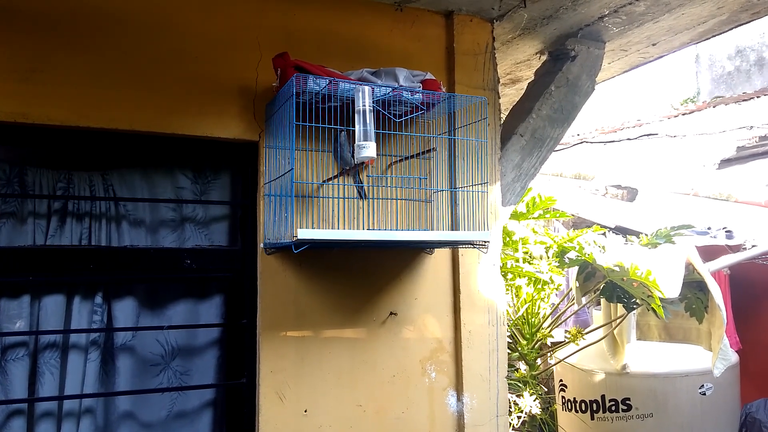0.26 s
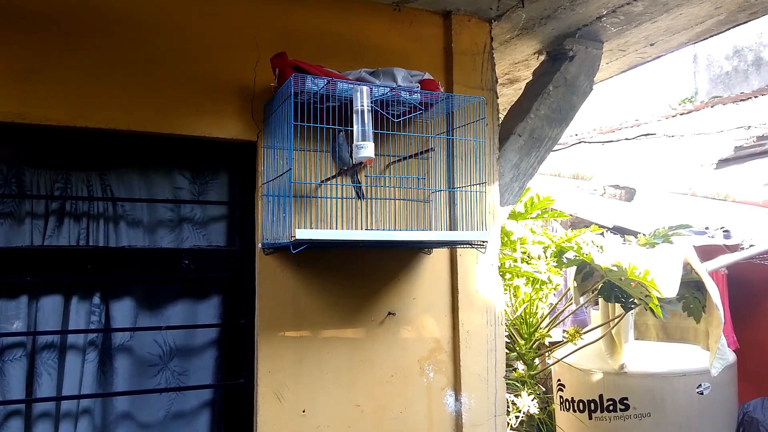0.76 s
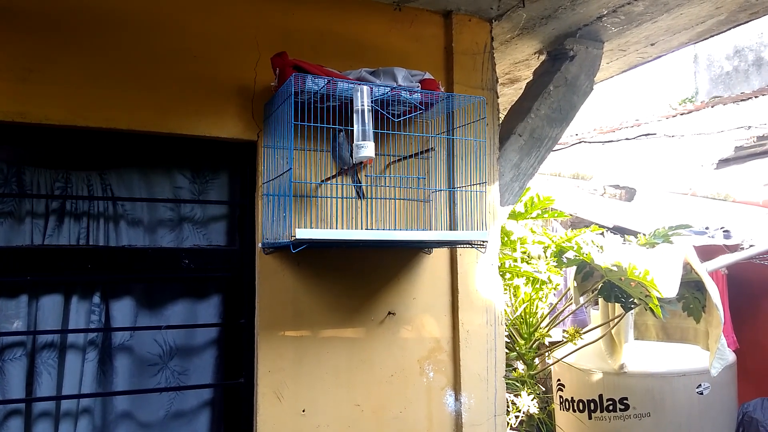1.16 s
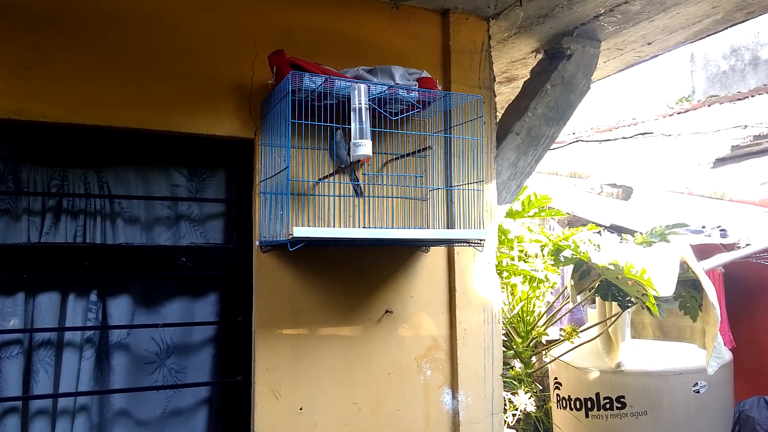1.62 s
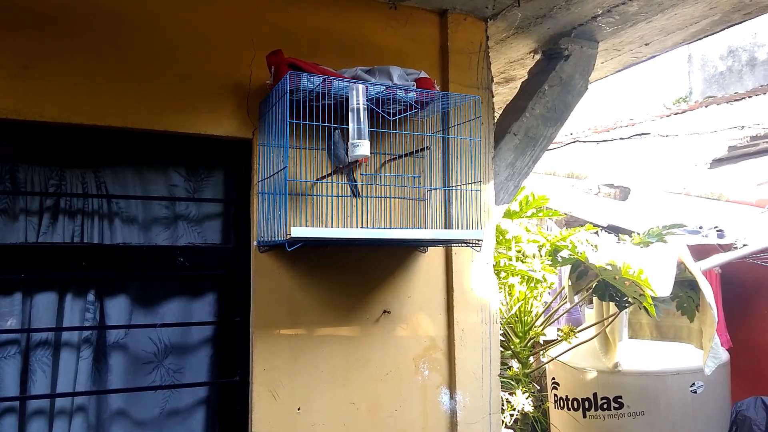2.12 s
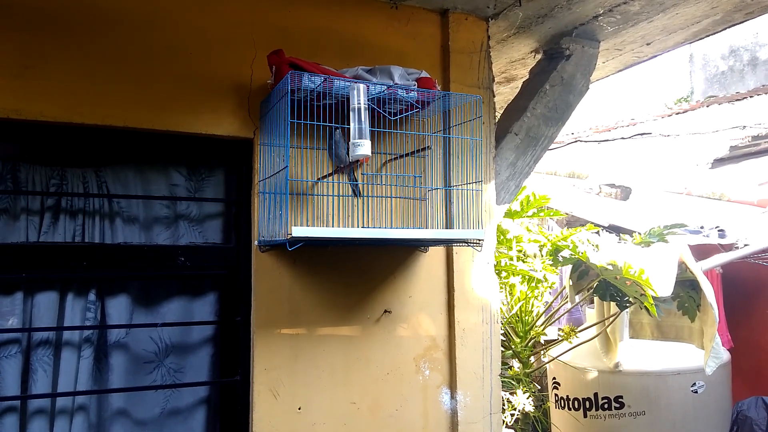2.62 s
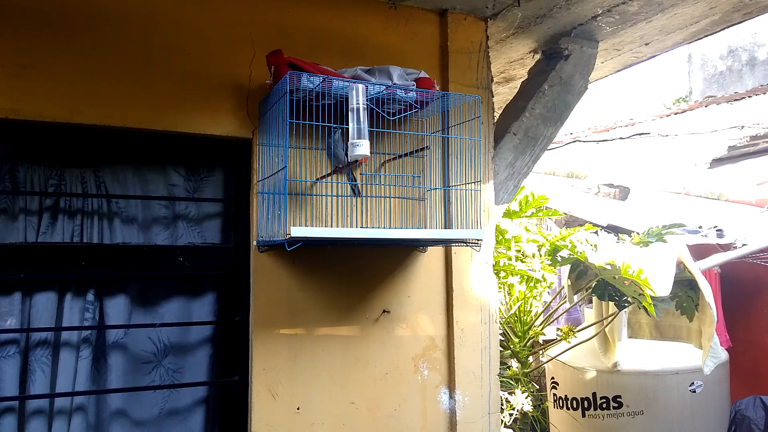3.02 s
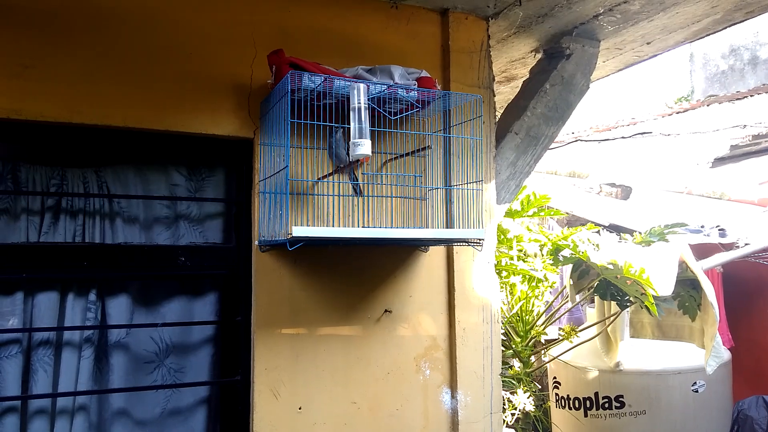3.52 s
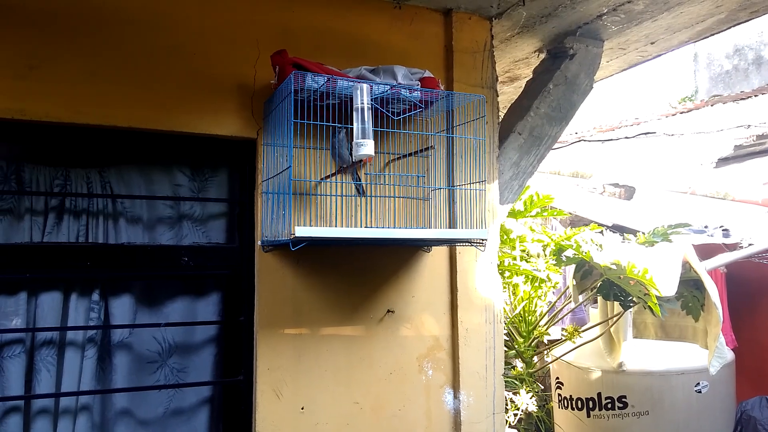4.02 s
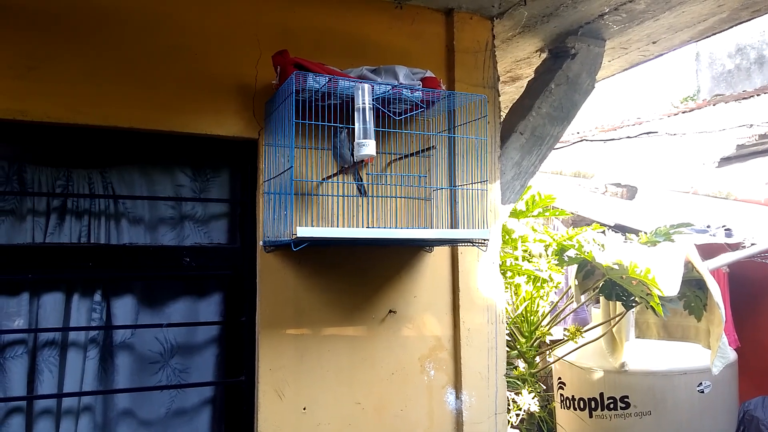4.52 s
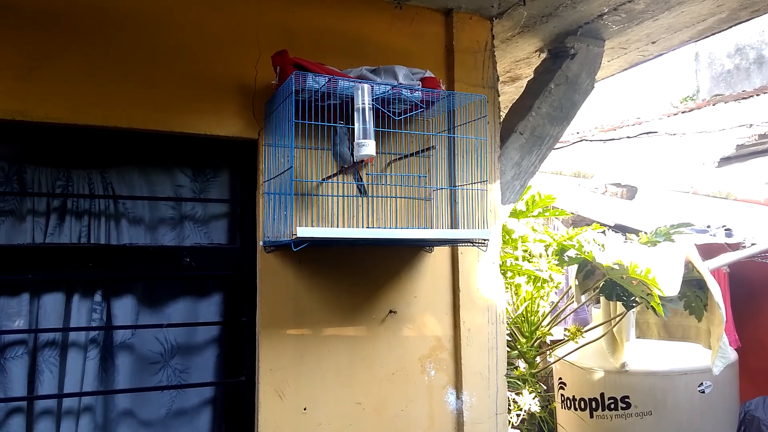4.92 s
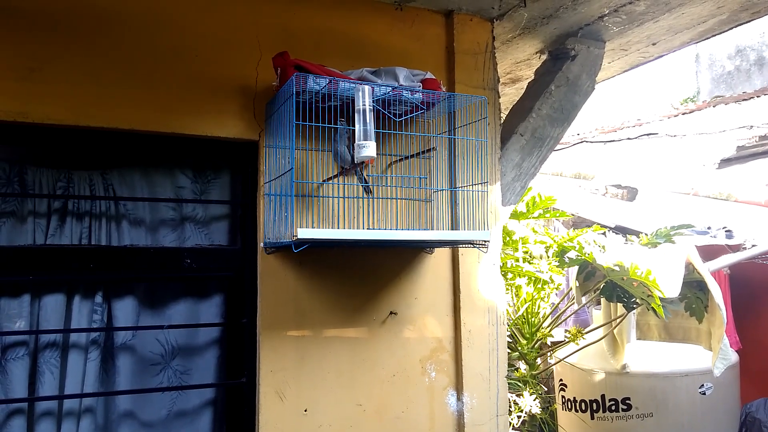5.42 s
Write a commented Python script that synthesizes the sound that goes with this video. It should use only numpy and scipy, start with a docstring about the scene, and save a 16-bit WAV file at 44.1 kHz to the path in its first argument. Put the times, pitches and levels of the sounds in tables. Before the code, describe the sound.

Outdoors under a house's concrete eaves, a phone catches a small bird's very fast song: glassy high notes, quick glides, trills and scratchy rasps, with tiny gaps and short reflections. It stops before three seconds. Muffled town noise and unsteady motor hum come up slightly; faint rustling on the right, a far chirp, then a single rasping call and finally a dull thud.

```python
"""A caged solitaire sings a fast run of whistles, glides, trills and rasps, later one harsh call, over town rumble.
Both sides of its syrinx sound as modulated sines with weak overtones and turbulent air hiss; beak snaps are noise.
Walls and a concrete roof answer with decaying noise tails. Traffic is coloured noise, a motor's hum a set of sines;
rustles and a far bird's overtones come before the harsh call, a dull knock after it. A phone's two microphones feed
a stereo widener and a gain control that turns down fast and recovers slowly."""
import sys
import numpy as np
from scipy import signal
from scipy.fft import rfft, irfft, next_fast_len
from scipy.io import wavfile
from scipy.ndimage import uniform_filter1d, map_coordinates

SR = 44100
rng = np.random.default_rng(int(sys.argv[2]) if len(sys.argv) > 2 else 0)


def gain_from_db(level_db):
    """Turn a decibel level (scalar or array-like) into a linear amplitude factor."""
    decades = np.asarray(level_db, float) / 20
    return 10 ** decades


def master_out(mix):
    """Clip the mix to full scale and print it as 16-bit PCM to the path in sys.argv[1]."""
    frames = np.transpose(np.atleast_2d(mix))
    ceiling = np.clip(frames, -1, 1)
    pcm = np.round(ceiling * 32767).astype(np.int16)
    wavfile.write(sys.argv[1], SR, pcm)


N = 249606

# All source levels are taken ahead of room, microphones, widener and gain control.
# Level notes, from brief pips to longer whistles: start_s, length_s, pitch_hz, level_db
WHISTLES = [(0.089, 0.089, 3003, -27), (0.119, 0.042, 3673, -23.5), (0.434, 0.075, 4600, -34.5),
            (0.256, 0.029, 3700, -24.5), (0.286, 0.037, 2260, -25), (0.364, 0.096, 2278, -30),
            (0.386, 0.097, 3646, -28.5), (0.397, 0.08, 5923, -33), (0.407, 0.06, 6910, -35),
            (0.597, 0.026, 2770, -28), (0.617, 0.038, 3006, -24.5), (0.626, 0.02, 3578, -29.5),
            (0.709, 0.046, 4560, -19), (0.739, 0.012, 3585, -19), (0.759, 0.018, 3070, -26),
            (0.777, 0.015, 4590, -18.5), (0.885, 0.028, 5573, -15), (0.91, 0.06, 3734, -20.5),
            (1.181, 0.0063, 3670, -20.5), (1.192, 0.067, 8840, -41), (1.588, 0.011, 5620, -13.5),
            (1.647, 0.023, 5540, -19.5), (1.747, 0.022, 2783, -25.5), (1.779, 0.084, 2862, -23),
            (1.797, 0.0066, 3290, -18), (1.808, 0.074, 4317, -21.5), (1.865, 0.051, 5668, -18.5),
            (2.236, 0.0055, 6750, -16.5), (2.712, 0.05, 2660, -25.5), (2.707, 0.031, 3796, -26.5),
            (2.752, 0.015, 3660, -18.5)]
# Gliding notes: start_s, length_s, start_hz, end_hz, level_db
GLIDES = [(0.0, 0.085, 4775, 4740, -26.5), (0.251, 0.038, 4950, 4630, -15.5),
          (0.298, 0.022, 2295, 1610, -35), (0.345, 0.031, 2900, 3450, -26.5),
          (0.78, 0.043, 2516, 1790, -30.5), (1.377, 0.085, 3030, 1550, -28.5),
          (1.38, 0.086, 5960, 2607, -22), (1.418, 0.034, 4050, 3566, -14.5),
          (2.237, 0.02, 5650, 5230, -20.5), (2.453, 0.02, 2570, 3480, -28),
          (2.477, 0.0322, 3690, 4140, -26.5), (2.48, 0.028, 2880, 2550, -25),
          (2.782, 0.081, 5200, 5390, -38)]
# Quick upward flicks leading into a note: start_s, start_hz, level_db
FLICKS = [(0.588, 1830, -29), (0.614, 3100, -31), (0.868, 3435, -20), (0.883, 3630, -19.5),
          (0.909, 2894, -21.5), (1.206, 2960, -23.5), (1.606, 3323, -24), (1.771, 3220, -29),
          (1.799, 3110, -34), (1.931, 3340, -20.5), (2.467, 4130, -30.5), (2.749, 2756, -11),
          (2.797, 5540, -32)]
FLICK_S, FLICK_RISE = 0.0112, 1.35  # length; end pitch over start pitch
# Short falling chips: start_s, start_hz, level_db
CHIPS = [(0.039, 5880, -32), (0.076, 4030, -16.5), (0.222, 6840, -27.5), (0.35, 3296, -26.5),
         (0.85, 7230, -23.5), (0.872, 5800, -17), (0.952, 3210, -21.5), (1.168, 2950, -28.5),
         (2.187, 4175, -18), (2.201, 2910, -17)]
CHIP_S, CHIP_FALL = 0.014, 0.87  # length; end pitch over start pitch
# Trains of swept chips: start_s, length_s, centre_hz, sweep_hz, chips_per_s, level_db
TRILLS = [(0, 0.062, 6530, 1099, 113, -16.5), (2.5, 0.18, 5950, -1800, 80, -22.5),
          (2.5, 0.161, 3780, -300, 68, -26), (2.5, 0.085, 3200, -400, 62, -24),
          (1.3, 0.098, 2850, 256, 68, -17.5)]
# Rasps with randomly shaken pitch: start_s, length_s, start_hz, end_hz, shake_hz, level_db
RASPS = [(1.2, .07, 3300, 3900, 550, -27), (1.245, .115, 5400, 4600, 300, -25),
         (1.25, .14, 4500, 3750, 300, -22.5), (1.275, .1, 1900, 1150, 120, -44),
         (1.605, .09, 4000, 3800, 500, -29), (1.94, .07, 3600, 3300, 480, -23),
         (2.04, .12, 3200, 3000, 420, -25), (2.17, .06, 3700, 3300, 500, -29),
         (4.575, .14, 1600, 2200, 260, -40), (4.575, .125, 2700, 3600, 190, -37),
         (4.595, .16, 3600, 4400, 190, -31), (4.59, .13, 5400, 6800, 250, -35),
         (4.69, .15, 5400, 4750, 220, -23.5), (4.68, .17, 4480, 3980, 150, -23),
         (2.755, .06, 3500, 3000, 300, -29), (.245, .06, 6600, 5600, 600, -36),
         (.09, .1, 4300, 3900, 500, -33)]
# Octave strength against note pitch: pitch_hz, octave_db
OCTAVE = [(2000, -5.5), (2350, -5), (2800, -21), (4600, -15.5), (6800, -7)]
# Higher overtones of the song: multiple, level_db
UPPER_OVERTONES = [(3, -38), (4, -50.5)]
# Relative spectrum of air hiss in the beak: frequency_hz, density_db (per Hz)
BREATH = [(1500, -39), (3000, -7), (5000, 2.5), (6800, -10.5), (8500, -6), (10000, -9), (11500, -6.5),
          (14000, -13.5), (15600, -21)]
# Decay time of wall and roof reflections: frequency_hz, t60_s
EAVES_DECAY = [(2000, 0.43), (4000, 0.48), (8000, 0.41), (15000, 0.28)]
# Relative spectrum of town noise: frequency_hz, density_db (per Hz)
TOWN_SPECTRUM = [(30, -53), (60, 4), (120, 7.5), (250, 1.5), (630, 0), (1300, -2.5), (1750, -12),
                 (2050, -9.5), (2400, -13), (2850, -4), (3300, -21), (4500, -29.5), (8000, -31.5),
                 (15700, -34.5)]
# Level of town noise over time: time_s, level_db
TOWN_LEVEL = [(0, -42.5), (2, -40), (2.9, -45), (3.3, -40.5), (4.5, -41), (5, -42.5), (5.66, -39)]
# Correlation of town noise between the two microphones: frequency_hz, correlation
TOWN_CORRELATION = [(60, .45), (500, .35), (2000, .2), (8000, .1)]
HUM_HZ = 59.6  # shaft rate of the motor
# Upper lines of the motor's hum: shaft_order, amplitude_db
HUM_LINES = [(3, -58), (4.015, -47.5), (6.99, -56), (8.02, -55), (9.7, -52), (10.66, -53.5), (13, -59.5),
             (11.77, -58.5), (15.9, -62), (18.95, -61.5), (21.36, -56.5)]
# Swelling and fading of the lowest hum line: time_s, level_db
DEEP_HUM_LEVEL = [(0.0, -64), (0.31, -69), (0.61, -39.5), (1.02, -56), (1.25, -42), (1.76, -46.5),
                  (1.84, -59), (3.41, -48.5), (3.97, -72), (4.65, -44.5), (4.82, -69), (5.66, -50)]
# Beak snaps between notes: start_s, level_db (at the start)
SNAPS = [(0.225, -19), (0.25, -26.5), (0.885, -25), (1.885, -19), (2.237, -24), (2.751, -30)]
# Relative spectrum of a snap: frequency_hz, density_db (per Hz)
SNAP_SPECTRUM = [(2500, -31.5), (5500, -6), (15000, -8.5)]
# Beating pairs of steady tones, levels before DUET_DB: start_s, length_s, pitch_hz, second_hz, level_db, second_db
DUETS = [(0.655, 0.1, 2989, 2920, -6, -11), (2.04, 0.125, 2988, 2803, -9, -8),
         (2.05, 0.11, 3195, 2908, -18, -15)]
DUET_DB, DUET_WET_DB = 4, -7  # gain of all duets; their further gain into the reflections
# Small rustles, levels before the left-right balance: start_s, level_db (at the start), t60_s
RUSTLES = [(3.546, -46.5, 0.61), (3.95, -62, 0.39), (4.2, -60, 0.29)]
# Relative spectrum of a rustle: frequency_hz, density_db (per Hz)
RUSTLE_SPECTRUM = [(3000, -35), (6000, -20), (9500, -11), (15700, -20)]
# Distant call, fundamental pitch and level before FAR_TONES: time_s, pitch_hz, level_db
FAR_CALL = [(4.202, 950, -78), (4.239, 988, -43.5), (4.279, 1072, -43.5), (4.341, 1085, -50.5),
            (4.42, 1080, -82), (4.479, 1130, -83)]
# Overtones heard in the distant call: multiple, level_db
FAR_TONES = [(2, -3), (3, 7.5)]
# Dull distant knocks: start_s, peak_db, pitch_hz
KNOCKS = [(5.282, -30, 244)]
# Right microphone relative to left: frequency_hz, difference_db
RIGHT_OVER_LEFT = [(200, 5), (1000, 2), (2500, -2), (5000, 2), (8000, 5), (13000, 7)]
# Strength of the widener's crossed copy: frequency_hz, level_db
CROSS_FEED = [(200, -9), (1200, -3), (2400, -1.5), (4900, -3.5), (7400, -2.5), (8500, -4), (10500, -11),
              (15000, -15)]
TOP_HZ, WIDEN_SAMPLES = 15700, 18  # upper limit of the microphone band; delay of the widener


def along(points, hz):
    """Linear interpolation of (Hz, value) points on a logarithmic frequency axis."""
    f, v = np.transpose(points)
    return np.interp(np.log(hz + 1), np.log(f + 1), v)


def unit(x):
    """Normalisation to unit root mean square."""
    return x / np.sqrt(np.mean(x ** 2) + 1e-20)


def wobble(rate):
    """Band-limited fluctuation: a smooth curve through random knots, rate of them per second."""
    return map_coordinates(rng.standard_normal(int(N * rate / SR) + 4), [np.arange(N) * rate / SR])


def filtered(x, response):
    """Linear filtering: the spectrum is multiplied by a complex response of frequency."""
    m = next_fast_len(N + 8192)
    return irfft(rfft(x, m) * response(np.fft.rfftfreq(m, 1 / SR)), m)[..., :N]


def hiss(spectrum, channels=1):
    """Coloured noise: white noise shaped by a spectrum, with unit rms."""
    return unit(filtered(rng.standard_normal((channels, N)), lambda hz: gain_from_db(along(spectrum, hz))))


def dying(s, db, t60):
    """Exponential decay: a sudden onset whose level falls 60 dB in t60 seconds."""
    t = np.arange(N) / SR
    return gain_from_db(db - 60 * np.clip(t - s, 0, 9) / t60) * (t > s)


def swell(length, rise_s, fall_s):
    """Amplitude envelope: place in the note (0-1) and a sine-squared outline."""
    u = np.linspace(0, 1, max(round(length * SR), 8))
    edges = np.minimum(u / rise_s, (1 - u) / fall_s) * length
    return u, np.sin(np.pi / 2 * np.clip(edges, 0, 1)) ** 2


def add(track, s, pitch_hz, size, octave_db=0, air_db=0):
    """Harmonic synthesis: a near sine with weak overtones in row 0, its air flow in row 1."""
    phase = 2 * np.pi * np.cumsum(pitch_hz) / SR
    tone = np.sin(phase)
    for k, db in [(2.03, octave_db + along(OCTAVE, pitch_hz))] + UPPER_OVERTONES:
        beak_loss = 1 + (k * pitch_hz / 12000) ** 6  # the beak passes little at the top
        tone += gain_from_db(db) * np.sin(round(k) * phase) / beak_loss
    start = max(round(s * SR), 0)
    track[:, start:start + len(size)] += [np.sqrt(2) * size * tone, gain_from_db(air_db) * size]


def notes():
    """Linear pitch glides: every clear note as (start s, length s, start Hz, end Hz, dB)."""
    level_notes = [(s, length, hz, hz, db) for s, length, hz, db in WHISTLES]
    flicks = [(s, FLICK_S, hz, FLICK_RISE * hz, db) for s, hz, db in FLICKS]
    chips = [(s, CHIP_S, hz, CHIP_FALL * hz, db) for s, hz, db in CHIPS]
    return GLIDES + level_notes + flicks + chips


def clear_notes(track, waver, flutter, shake, rough):
    """Frequency and amplitude modulation: wide glides are rougher than level notes."""
    for s, length, hz0, hz1, db in notes():
        u, shape = swell(length, min(.25 * length, .008), min(.3 * length, .012))
        at = max(round(s * SR), 0) + np.arange(len(u))
        harsh = min(abs(hz1 - hz0) / 1000, 1)
        unsteady_hz = 55 * waver[at] + 130 * harsh * shake[at]
        unsteady_db = 3.2 * flutter[at] + 4 * harsh * rough[at]
        add(track, s, hz0 + (hz1 - hz0) * u + unsteady_hz, gain_from_db(db + unsteady_db) * shape)


def trills(track, waver, flutter, shake):
    """Periodic modulation: pitch sweeps and loudness pulses once in each chip."""
    for s, length, hz, sweep_hz, rate, db in TRILLS:
        u, shape = swell(length, 0.04 if s else .001, 0.02)
        at = round(s * SR) + np.arange(len(u))
        cycle = (u * length * rate + .09 * waver[at]) % 1
        chip = np.sin(np.pi * cycle) ** 2.5
        pitch_hz = hz + sweep_hz * (2 * cycle - 1) + 140 * shake[at]
        add(track, s, pitch_hz, gain_from_db(db + flutter[at]) * shape * chip)


def rasps(track, shake, rough):
    """Random frequency modulation: rising rasps swell slowly, falling ones start faster."""
    for k, (s, length, hz0, hz1, shake_hz, db) in enumerate(RASPS):
        rise = .75 if hz1 > hz0 else .3
        u, shape = swell(length, rise * length, 0.5 * length)
        at = (round(s * SR) + 3000 * k + np.arange(len(u))) % N  # offset so that overlapping rasps differ
        pitch_hz = hz0 + (hz1 - hz0) * u + shake_hz * shake[at]
        add(track, s, pitch_hz, gain_from_db(db + 4 * rough[at]) * shape, octave_db=-8, air_db=-2)


def patchy(x, patchy_db):
    """Time-frequency modulation: random patches of noise come out louder or softer."""
    z = signal.stft(x, nperseg=256)[2]
    field = uniform_filter1d(rng.standard_normal(z.shape), size=5, axis=0)
    field = uniform_filter1d(field, size=16, axis=1)
    return unit(signal.istft(z * gain_from_db(patchy_db * unit(field)), nperseg=256)[1][:N])


def solitaire():
    """Syrinx and turbulence: modulated tones with air hiss that follows the outline of each note."""
    track = np.zeros((2, N))
    waver, flutter, shake, rough = wobble(140), wobble(110), wobble(700), wobble(500)
    clear_notes(track, waver, flutter, shake, rough)
    trills(track, waver, flutter, shake)
    rasps(track, shake, rough)
    air_flow = uniform_filter1d(track[1], size=500)
    return track[0] + gain_from_db(-11) * air_flow * patchy(hiss(BREATH)[0], patchy_db=6)


def eaves(x, block=4096):
    """Reverberation: wall and roof tails decay by frequency, with a fresh random grain in each block."""
    out, fade = np.zeros((2, N + SR)), np.hanning(2 * block)
    padded = np.pad(x, (block, 2 * block))
    for start in range(0, N + block, block):
        hz, t, z = signal.stft(rng.standard_normal((2, SR * 3 // 5)), SR, nperseg=256)
        decay = gain_from_db(-60 * t / along(EAVES_DECAY, hz)[:, None])
        tail = signal.istft(z * decay, SR, nperseg=256)[1]
        tail = tail / np.linalg.norm(tail[0])
        piece = padded[start:start + 2 * block] * fade
        wet = signal.fftconvolve(piece[None], tail, axes=1)
        out[:, start:start + wet.shape[1]] += wet[:, :N + SR - start]
    return out[:, block - 130:][:, :N]  # reflections start 130 samples late


def traffic():
    """Partly coherent noise: far traffic shares a mid signal and differs by a side signal."""
    def angle(hz):
        return np.arccos(np.clip(along(TOWN_CORRELATION, hz), -1, 1)) / 2

    mid, side = filtered(rng.standard_normal((2, N)), lambda hz: (
        gain_from_db(along(TOWN_SPECTRUM, hz)) * [np.cos(angle(hz)), np.sin(angle(hz))]))
    level_db = np.interp(np.arange(N) / SR, *np.transpose(TOWN_LEVEL)) + 0.42 * wobble(4.08)
    return gain_from_db(level_db) * unit(np.array([mid + side, mid - side]))


def motor():
    """Rotational line spectrum: sines at shaft orders waver, with a phase offset between the channels."""
    sides, hum = np.array([[1], [-1]]), np.zeros((2, N))
    for order, db in HUM_LINES:
        size = gain_from_db(db + 2.76 * wobble(11))
        phase = 2 * np.pi * np.cumsum(order * HUM_HZ + 1.504 * wobble(8)) / SR
        hum += size * np.sin(phase + rng.uniform(0.1, 0.5) * sides)
    deep_size = np.sqrt(2) * gain_from_db(np.interp(np.arange(N) / SR, *np.transpose(DEEP_HUM_LEVEL)))
    deep_phase = 2 * np.pi * np.cumsum(HUM_HZ + 3 * wobble(12)) / SR
    return hum + deep_size * np.sin(deep_phase + .6 * sides)


def snaps():
    """Impulsive noise: beak snaps are bright bursts that decay within milliseconds."""
    size = sum(dying(s, db, t60=0.013) for s, db in SNAPS)
    return size * hiss(SNAP_SPECTRUM)[0]


def duets():
    """Beating: two steady, nearly pure tones close in pitch, sung towards the phone."""
    track = np.zeros(N)
    waver, flutter = wobble(120), wobble(60)
    for s, length, hz, second_hz, db, second_db in DUETS:
        u, shape = swell(length, .5 * length, .4 * length)
        at = round(s * SR) + np.arange(len(u))
        for side_hz, side_db in (hz, db), (second_hz, second_db):
            phase = 2 * np.pi * np.cumsum(side_hz + 8 * waver[at]) / SR
            tone = np.sin(phase) + gain_from_db(-36) * np.sin(3 * phase)
            track[at] += gain_from_db(side_db + 2 * flutter[at]) * shape * tone
    return gain_from_db(DUET_DB) * track


def rustles():
    """Decaying granular noise: dry rustles, louder on the right, die away."""
    size = sum(dying(s, db, t60) for s, db, t60 in RUSTLES)
    grain = gain_from_db(2 * wobble(450))
    return size * grain * hiss(RUSTLE_SPECTRUM, channels=2) * gain_from_db([[-7], [0]])


def far_bird():
    """Harmonics without a fundamental: a distant rising call on two overtones."""
    s, hz, db = np.transpose(FAR_CALL)
    t = np.arange(N) / SR
    phase = 2 * np.pi * np.cumsum(np.interp(t, s, hz) + 16 * wobble(150)) / SR
    tones = sum(gain_from_db(d) * np.sin(round(k) * phase) for k, d in FAR_TONES)
    return gain_from_db(np.interp(t, s, db, left=-200, right=-200)) * tones


def knocks():
    """Damped resonance: a short wooden ring is a sine with exponential decay."""
    t = np.arange(N) / SR
    return sum(dying(s, db, t60=0.029) * np.sin(2 * np.pi * hz * (t - s)) for s, db, hz in KNOCKS)


def scene():
    """Superposition: direct song reaches the left microphone first and louder; reflections and background join."""
    bird, pure, far = solitaire() + snaps(), duets(), far_bird()
    delay_samples = np.array([[0], [9.5]])
    direct = filtered(bird + pure, lambda hz: np.exp(-2j * np.pi * hz * delay_samples / SR))
    direct = direct * gain_from_db([[2], [-4]])
    reflected = eaves(gain_from_db(1.5) * (bird + gain_from_db(DUET_WET_DB) * pure) + far)
    return direct + reflected + 0.59 * far + rustles() + knocks() + traffic() + motor()


def gain_control(x, above_db, slope, attack_s, release_s, block=256):
    """Dynamic compression: level above a threshold lowers the gain, which recovers more slowly."""
    power = uniform_filter1d(np.mean(x ** 2, 0), size=1024)[::block]
    level_db = 5 * np.log10(power ** 2 + 1e-24)
    wanted = -slope * np.maximum(level_db - above_db, 0)
    gain_db, now = np.zeros_like(wanted), -8.5  # already turned down at the start
    for i, db in enumerate(wanted):
        now += (db - now) * min(block / SR / (attack_s if db < now else release_s), 1)
        gain_db[i] = now
    return x * gain_from_db(np.interp(np.arange(N), np.arange(len(gain_db)) * block, gain_db))


def microphones(x):
    """Frequency response: the two microphones differ in colour and share an upper band limit."""
    sides = np.array([[-1], [1]])
    return filtered(x, lambda hz: gain_from_db(along(RIGHT_OVER_LEFT, hz) / 2 * sides) * (hz < TOP_HZ))


def widener(x):
    """Crosstalk subtraction: each side loses a delayed, coloured copy of the other."""
    copy = filtered(x[::-1], lambda hz: (
        gain_from_db(along(CROSS_FEED, hz)) * np.exp(-2j * np.pi * hz * WIDEN_SAMPLES / SR)))
    return x - copy


def low_pass(x):
    """Removes everything above the highest recorded frequency."""
    return signal.sosfilt(signal.butter(12, 15790, fs=SR, output="sos"), x)


def record(dry):
    """Signal chain: microphone colour, stereo widening, then gain control."""
    wide = widener(microphones(dry))
    mix = gain_control(wide, above_db=-27.5, slope=0.48, attack_s=.03, release_s=0.64)
    return low_pass(mix)


dry = scene()
out = record(dry)
master_out(out)
```